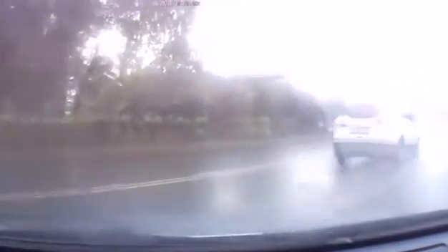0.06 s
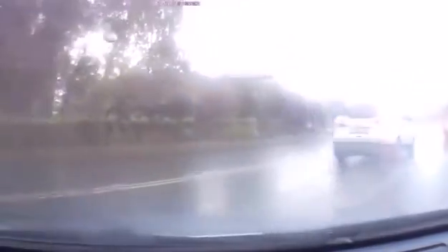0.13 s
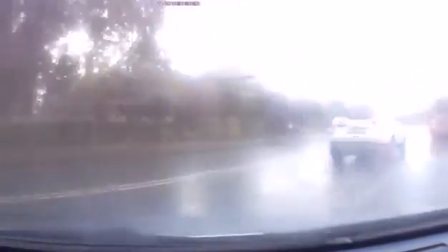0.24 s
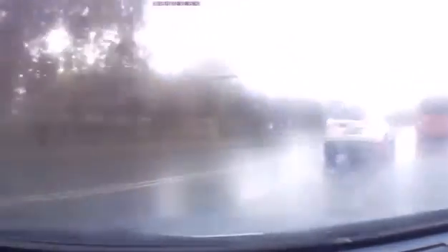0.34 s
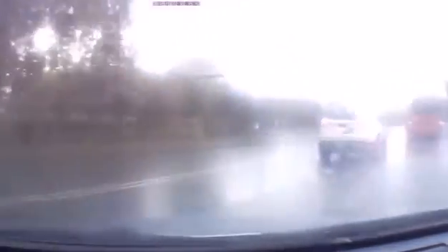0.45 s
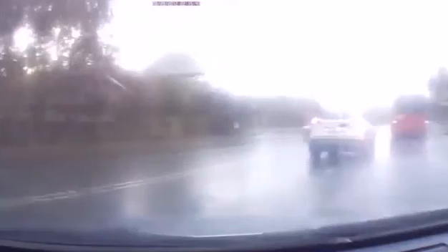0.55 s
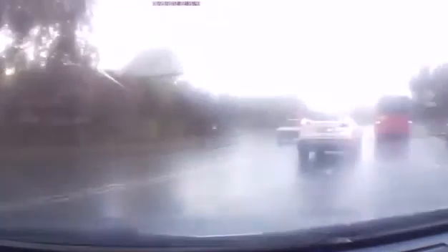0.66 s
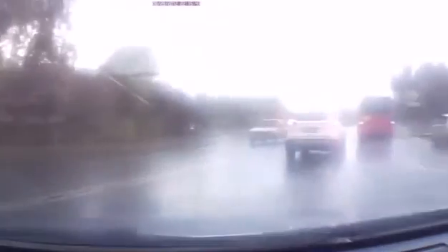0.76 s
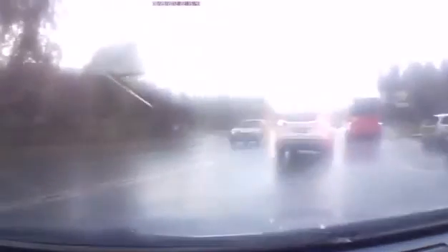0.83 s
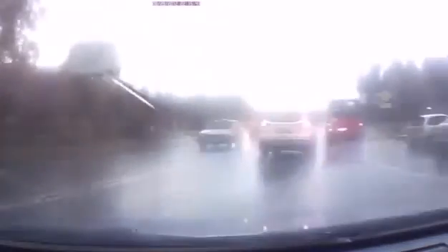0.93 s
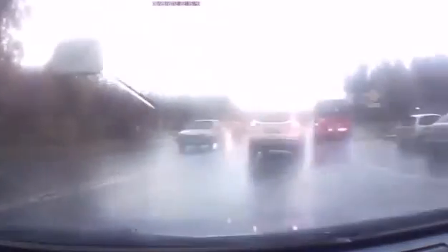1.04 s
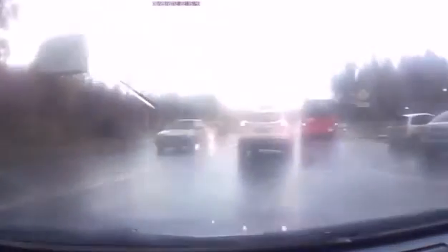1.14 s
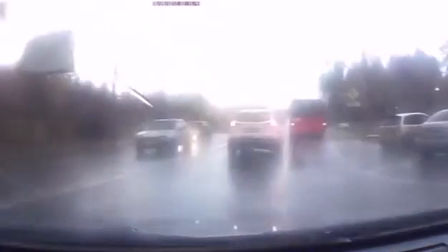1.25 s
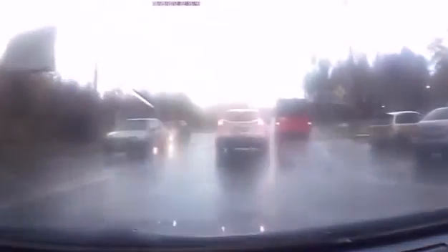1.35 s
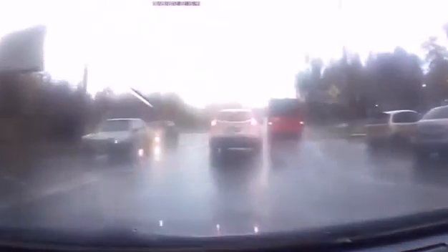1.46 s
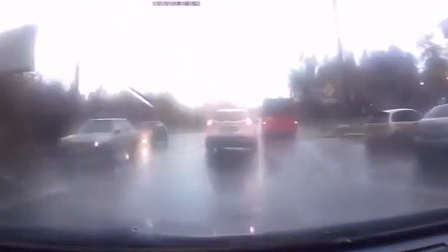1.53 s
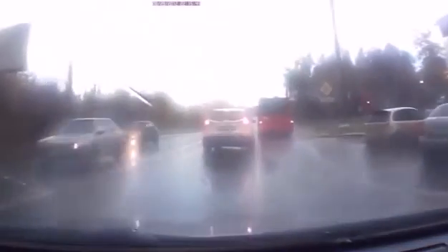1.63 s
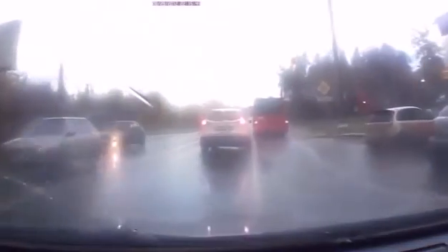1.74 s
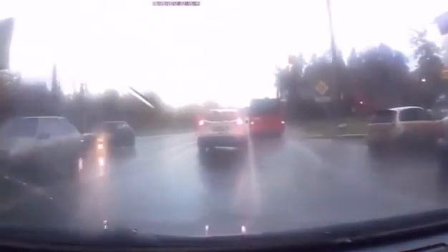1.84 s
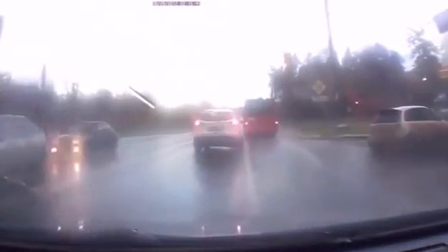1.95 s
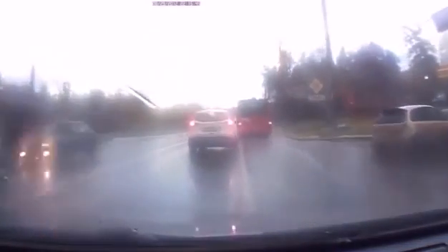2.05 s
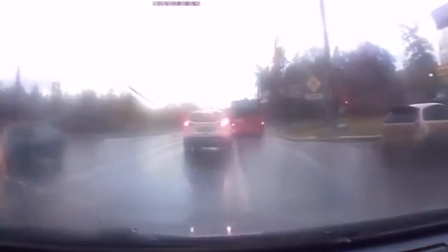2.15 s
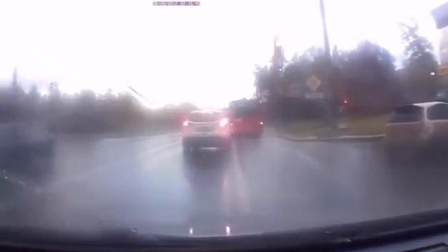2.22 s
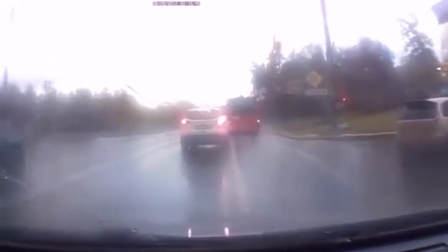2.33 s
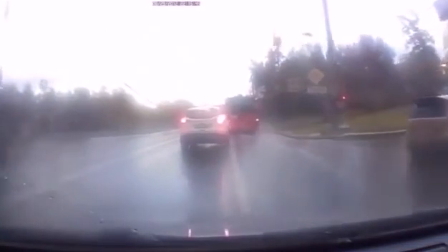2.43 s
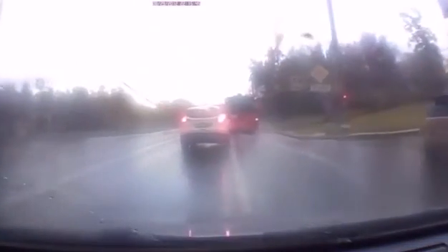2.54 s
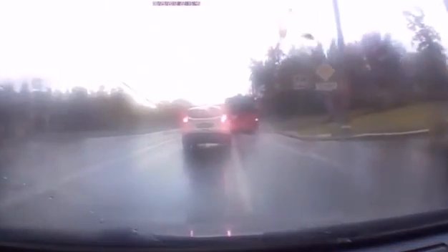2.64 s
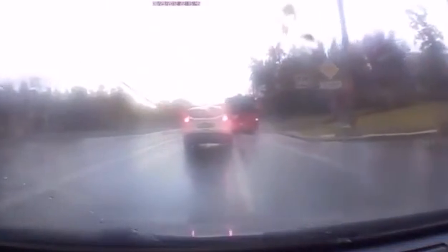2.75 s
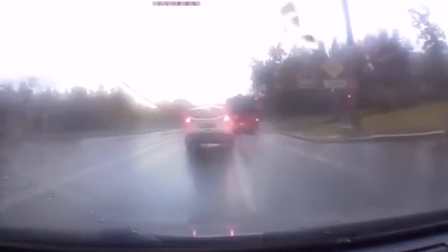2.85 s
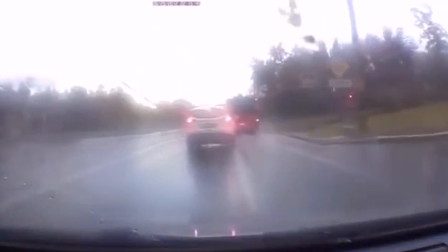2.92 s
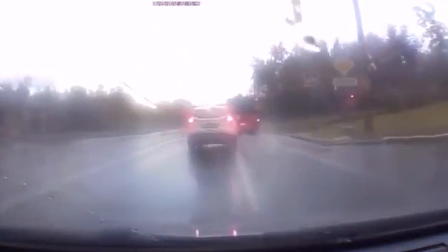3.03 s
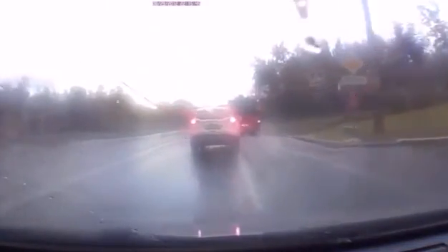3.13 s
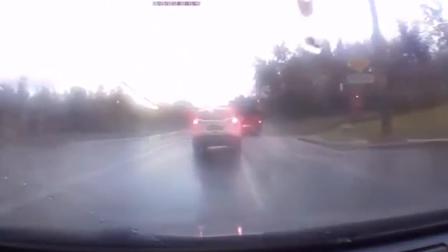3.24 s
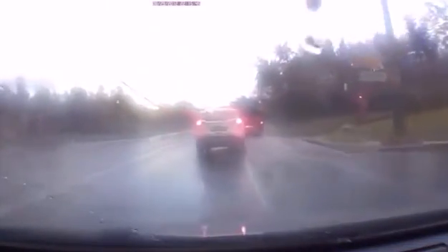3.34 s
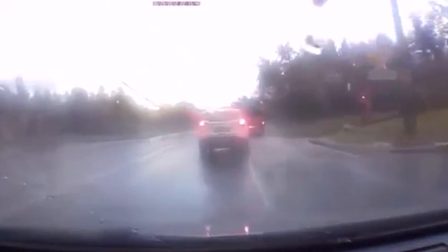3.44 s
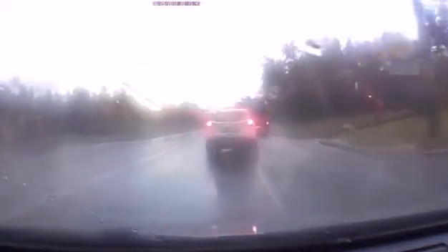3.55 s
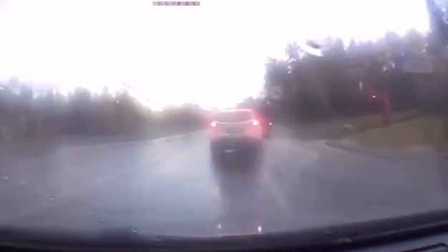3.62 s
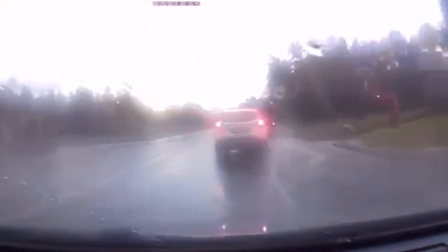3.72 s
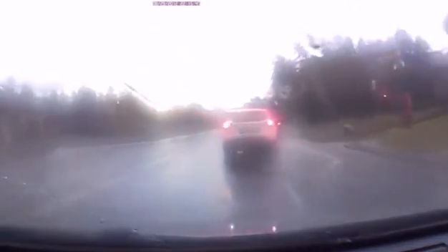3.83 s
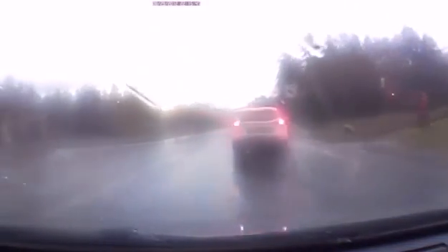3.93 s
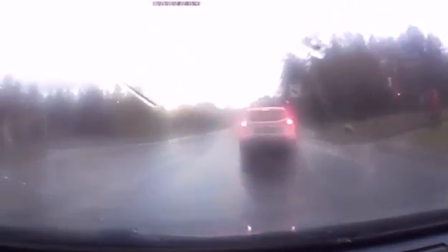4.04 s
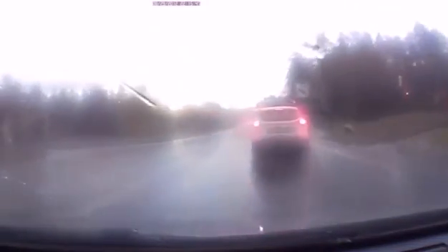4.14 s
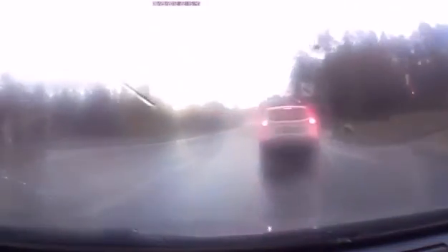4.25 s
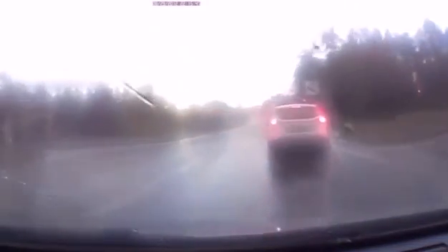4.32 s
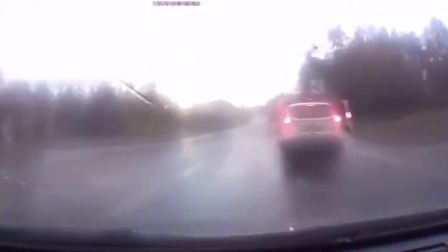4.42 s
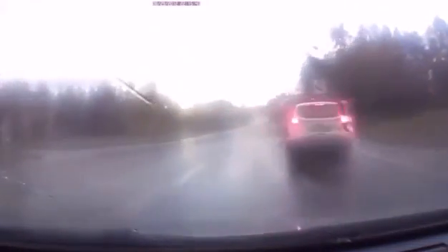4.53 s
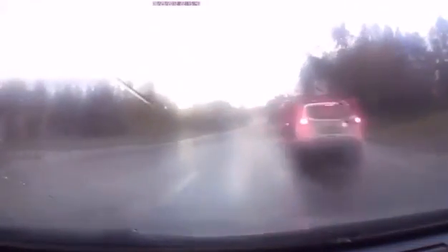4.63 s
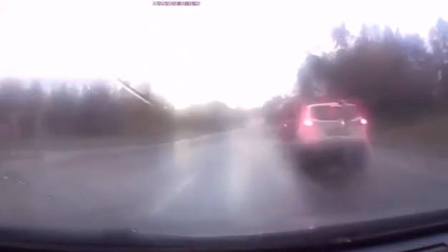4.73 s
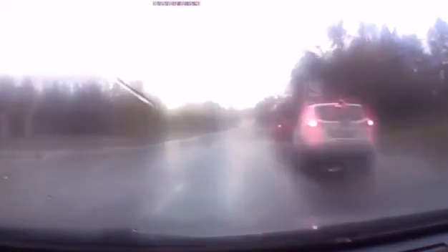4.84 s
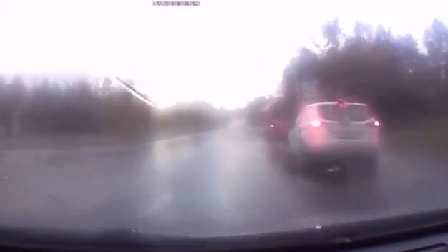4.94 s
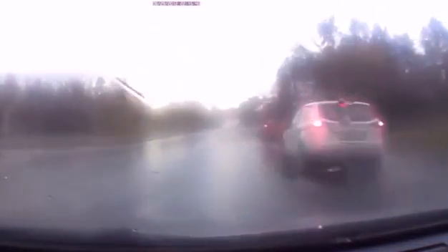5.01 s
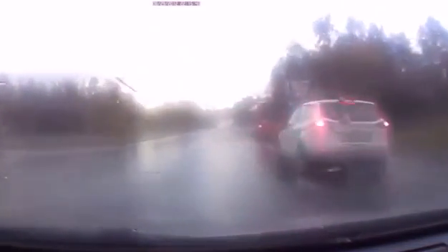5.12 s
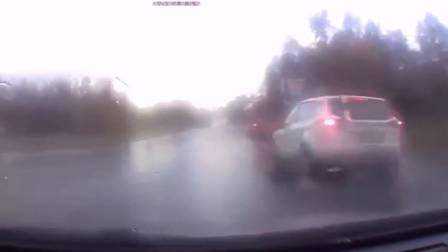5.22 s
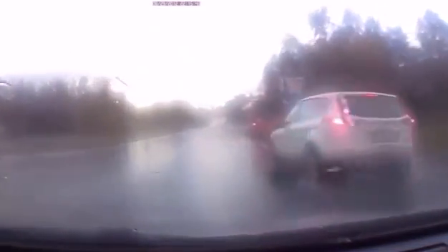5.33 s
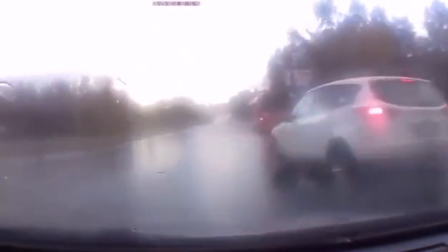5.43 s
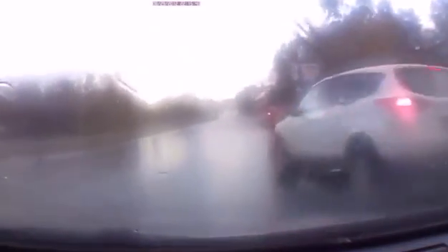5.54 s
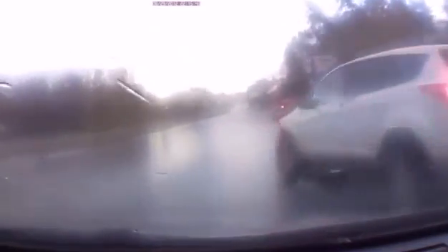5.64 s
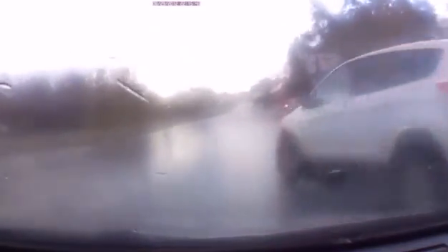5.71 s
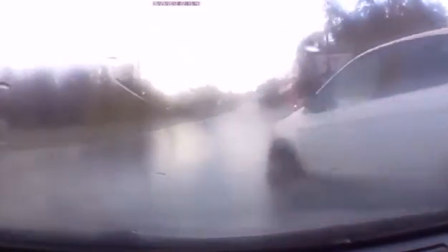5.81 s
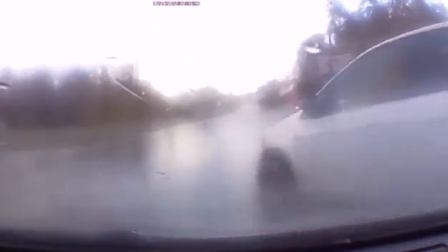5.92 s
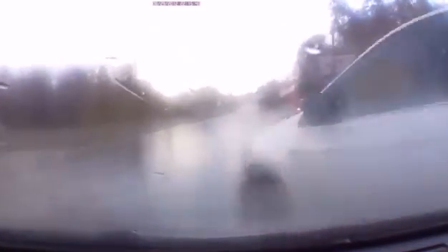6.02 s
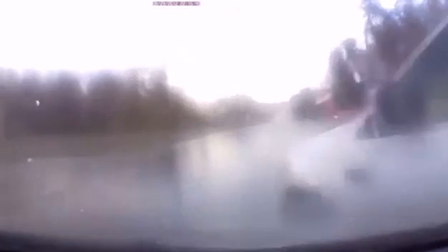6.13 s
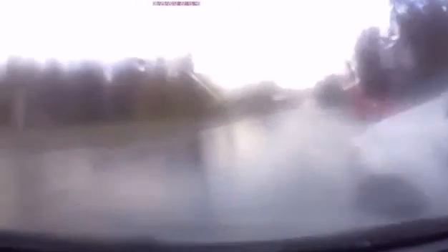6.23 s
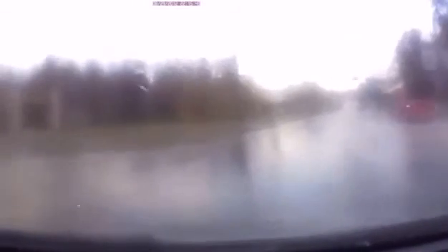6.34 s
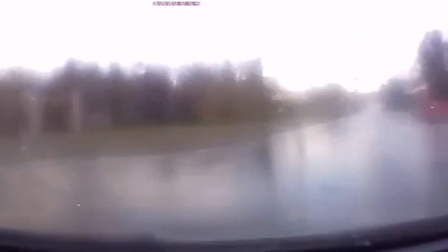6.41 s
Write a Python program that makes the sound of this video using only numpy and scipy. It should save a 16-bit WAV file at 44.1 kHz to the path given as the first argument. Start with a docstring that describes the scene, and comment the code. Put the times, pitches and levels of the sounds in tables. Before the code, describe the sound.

Inside a small car on a wet road, the engine pulls, shifts and revs again, trim rattles under braking, then a violent crunching crash.

```python
"""Inside a small car on a wet road, microphone on the windscreen: the engine pulls, shifts up and pulls again.
Engine lines follow the firing rate over a growl of unequal cylinders; shaped noise makes tyres and passing traffic.
Clustered clicks ring the loose dashboard trim as the car brakes, shudders and hits another car.
Heavier clusters thump the body, crumple panels and splinter plastic until the microphone overloads."""
import sys
import numpy as np
from scipy import signal
from scipy.fft import rfft, irfft
from scipy.io import wavfile
from scipy.ndimage import uniform_filter1d

SR = 44100
rng = np.random.default_rng(int(sys.argv[2]) if len(sys.argv) > 2 else 0)


def log_audio(samples):
    """Write samples as a 16-bit WAV file to the path given in sys.argv[1]."""
    # one column per channel
    frames = np.atleast_2d(samples).T
    # limit to full scale, then quantise
    limited = np.clip(frames, -1, 1)
    pcm = np.round(limited * 32767).astype(np.int16)
    wavfile.write(sys.argv[1], SR, pcm)


N = 285327
T = np.arange(N) / SR
BRAKE_S = 5.53  # hard braking begins

# engine load, a gentle pull, the clutch, a hard pull, then off the pedal: [t/s, level/dB]
LOAD = [(0, -19.5), (1.35, -8), (1.85, -13.5), (2.18, -5.5), (2.62, -11), (2.85, -19), (3.1, -22.5),
        (3.36, -3), (3.55, -0.5), (4.9, -2.5), (5.45, 2.5), (5.65, -13), (6.47, -22)]
# spectrum of tyre spray: [f/Hz, level/dB]
SPRAY_SPECTRUM = [(700, 3), (1450, 12), (1900, 1.5), (2400, 2), (2800, 0.5), (3150, -6.5), (3700, -1.5),
                  (4300, -17), (4900, -12.5), (7000, -18.5), (15000, -23)]
# spectrum of ticking and cracking plastic: [f/Hz, level/dB]
PLASTIC_SPECTRUM = [(1500, -28.5), (3600, 12), (4300, 0.5), (4900, 6), (5600, -10), (6600, -2),
                    (8000, -6.5), (12500, -7.5), (15000, -9.5)]
# resonances of the body shell: [f/Hz, width/Hz, level/dB]
SHELL_MODES = [(42, 32, 0.5), (72, 31.8, 1.5), (129.5, 17, 2), (175.3, 16.5, 6.5), (199.2, 17.4, 5),
               (241, 30, 0), (302, 22.4, -3.5), (373, 21, -6), (433, 30, -2), (476, 30, -7)]
# bumpers touch, then the front corner gives way in stages:
# [t/s, body thud level/dB, sheet-metal crunch level/dB, splinter level/dB, length/s]
IMPACTS = [(6.307, -2.5, -32, -55, 0.0029), (6.313, -14, -12.5, -45, 0.0021),
           (6.325, -5.5, -9.5, -38, 0.0076), (6.338, 4, -7, -24.5, 0.0034), (6.344, -5.5, -5, -27, 0.0028),
           (6.351, 0.5, 0, -20.5, 0.0032), (6.361, 4, -15, -30, 0.0041), (6.372, -2, -2.5, -43, 0.0088),
           (6.384, -3, 1, -24, 0.0035), (6.392, -6, -8, -25, 0.0042), (6.404, 0.5, -28, -36, 0.0081),
           (6.412, 3, -5, -28, 0.002), (6.42, -9, -5, -22, 0.0039), (6.428, 6.5, -6.5, -21, 0.0028),
           (6.434, -11, 1, -19, 0.0039), (6.442, 2, -4.5, -24, 0.0038), (6.45, -11, -15, -29, 0.0099)]


def engine(boom_db=1, waver_db=.5, uneven_db=-8, wobble=0.002, rough_db=2):
    """Low firing orders boom in the cabin, unequal cylinders growl in quarter orders, and gears whine."""
    # four-cylinder firing rate: [t/s, f/Hz]
    revs = [(0, 45.79), (.5, 60.32), (1, 76.02), (1.5, 88.95), (2, 102.8), (2.28, 111.4), (2.6, 102.4),
            (3, 88.33), (3.38, 76.03), (3.6, 66.6), (4, 74.02), (4.5, 83.08), (5, 90.05), (5.5, 99),
            (6.47, 89.76)]
    # cabin response to a firing order, before boom_db and load: [f/Hz, level/dB]
    boom_response = [(50, -18), (68, -38.5), (78, -27), (98, -29.5), (110, -25.5), (120, -29.5), (134, -30),
                     (150, -34), (172, -35.5), (190, -42.5), (228, -51), (248, -34), (280, -54), (335, -42)]
    # gearbox and belt drive: [multiple of firing rate, lower-gear level/dB, higher-gear level/dB]
    whines = [(3.72, 2, -7.5), (4, -21, -11), (4.44, -2.5, -10), (4.95, 1, -3), (5.4, 2, -10),
              (5.98, -2, 1), (7, 2, -5), (10.96, 2, -6)]
    # cabin resonances that a whine sweeps through: [f/Hz, level/dB]
    whine_path = [(260, -14), (335, 6.5), (390, -11), (445, 1), (490, 3), (550, -4.5), (670, -4.5),
                  (850, -15), (1150, -11.5)]
    # spectrum of the growl: [f/Hz, level/dB]
    growl_spectrum = [(100, -22), (180, -4), (260, 1), (350, -1), (430, -12), (490, 3.5), (660, 2),
                      (850, -10.5), (1150, -19), (1500, -61.5), (3000, -70)]
    shift_s, shift_length_s, high_gear_growl_db = 2.18, 0.27, -4
    # base levels hold at reference_hz and 0 dB load; both grow with revs and a share of the load
    reference_hz = 97.6
    base_growl_db, growl_db_per_hz, growl_load_share = -40.5, 0.15, 0.55
    base_whine_db, whine_db_per_hz, whine_load_share = -45.5, 0.36, 0.63

    hz, = curves(revs)
    load_db, = curves(LOAD)
    shifted = np.clip((T - shift_s) / shift_length_s, 0, 1)
    extra_hz = hz - reference_hz

    # uneven firings shake the crank speed, which blurs the high orders most
    shake = .0038 * walk(45)
    phase = 2 * np.pi * np.cumsum(hz * (1 + shake + wobble * walk(14))) / SR

    def tone(order, db):
        """A wavering line locked to the crankshaft."""
        level = np.sqrt(2) * undb(db + waver_db * walk(21.15))
        return level * np.sin(order * phase + rng.uniform(0, 2 * np.pi))

    boom = 0
    for order in (1, 2, 3):
        boom = boom + tone(order, boom_db + load_db + response(boom_response, order * hz))

    whine_db = base_whine_db + whine_db_per_hz * extra_hz + whine_load_share * load_db
    whine = 0
    for order, low_db, high_db in whines:
        flutter_db = 1.8 * walk(60)
        gear_db = low_db + (high_db - low_db) * shifted
        path_db = response(whine_path, order * hz)
        whine = whine + tone(order, whine_db + gear_db + path_db + flutter_db)

    # one working cycle holds four firings and repeats; its harmonics leave room for the boom orders
    count = 2048
    harmonic = np.arange(count // 2 + 1)
    strength = np.where(harmonic % 4 == 0, 1, undb(uneven_db))
    strength = strength * (harmonic > 4) * (harmonic < 120) * (harmonic != 8) * (harmonic != 12)
    cycle = irfft(strength * np.exp(2j * np.pi * rng.random(len(harmonic))))
    firing = np.interp(phase / (8 * np.pi), np.arange(count) / count, cycle, period=1)
    growl = unit(colour(firing * undb(rough_db * walk(90)), growl_spectrum))
    growl_db = base_growl_db + growl_db_per_hz * extra_hz + growl_load_share * load_db
    growl_db = growl_db + high_gear_growl_db * shifted
    return boom + whine + undb(growl_db) * growl


def crash(thud_hz=700, crunch_hz=6000):
    """Every impact thumps the body shell, buckles the panels with a snap and a crunch, and cracks plastic."""
    # resonances of the outer panels: [f/Hz, width/Hz, level/dB]
    panel_modes = [(493, 110, 8), (654, 91, 0), (698, 29, 7.5), (825, 220, 0), (950, 72, 5.5),
                   (1070, 37, 8), (1133, 50, 1), (1230, 78, 4.5), (1420, 51, 7), (1480, 150, -1.5),
                   (1670, 150, -1), (1835, 250, -4.5), (2330, 53, -5), (2700, 160, -13), (3560, 280, -14.5),
                   (3760, 200, -19)]
    s, thud_db, crunch_db, splinter_db, length = np.transpose(IMPACTS)
    thuds = chatter(s, thud_db, length, rate=500, spread_db=3, rise=.3, main_db=14)
    crunches = chatter(s, crunch_db, length, rate=2200, spread_db=4, rise=.5, main_db=9)
    cracks = chatter(s, splinter_db, length, rate=4500, spread_db=3, rise=.7)
    shell = ring(soften(thuds, thud_hz), SHELL_MODES)
    panels = ring(soften(crunches, crunch_hz), panel_modes)
    return shell + cabin(panels + colour(cracks, PLASTIC_SPECTRUM))


def knocks(length=0.0022, thump_length=0.0097, thump_hz=240):
    """Loose things knock the dashboard, each spot ringing at its own pitch, and thump the body shell."""
    # [t/s, knock level/dB, body thump level/dB, contact hardness f/Hz, multiple of the dashboard's modes]
    blows_table = [(3.37, -46, -47, 1797, 1), (4.174, -35, -36, 991, .8), (5.063, -27.5, -38, 2020, 1.05),
                   (5.615, -15.5, -15, 5000, 1.03), (5.62, -35, -24, 3530, 1.25),
                   (5.737, -42, -21.5, 897, 1), (5.752, -36, -45, 3000, 1), (5.819, -29, -25, 5000, 1.1),
                   (5.827, -19.5, -28, 2500, .82), (6.04, -17.5, -19, 4000, .98)]
    # resonances of the dashboard: [f/Hz, width/Hz, level/dB]
    dash_modes = [(204.9, 69, 5.5), (450, 72, 10), (750, 120, 9.5), (1083, 110, 8), (1380, 91, -2),
                  (2340, 210, -11), (2860, 170, -17), (3370, 220, -18.5)]
    blows, thumps = 0, 0
    for s, db, thump_db, contact_hz, tuning in blows_table:
        blow = chatter([s], [db], [length], rate=2500, spread_db=3, rise=.2, main_db=18)
        modes = [(hz * tuning, width, mode_db) for hz, width, mode_db in dash_modes]
        blows = blows + ring(soften(blow, contact_hz), modes)
        thumps = thumps + chatter([s], [thump_db], [thump_length], rate=900, spread_db=3, rise=.3, main_db=16)
    return blows + ring(soften(thumps, thump_hz), SHELL_MODES)


def trim(tick_db=-21):
    """Plastic parts of slightly different pitch bounce: each impact ticks and rings its part."""
    # loudest rattles of the loose dashboard trim: [t/s, level/dB, chatter length/s, tick brightness level/dB]
    rattles = [(.424, -49.5, 0.004, 6), (2.461, -41.5, 0.0031, 8), (2.49, -44, 0.0027, 6),
               (2.949, -48.5, .007, 3), (3.21, -45.5, 0.02, 0), (3.416, -42, 0.0088, 4),
               (3.4735, -32.5, 0.0022, -6), (4.039, -39.5, 0.0044, 6), (4.196, -42, .0025, 6),
               (4.227, -40, 0.0033, 1), (4.276, -48, 0.0076, 7), (4.383, -35.5, 0.011, -1),
               (4.396, -28.5, 0.0032, 0.5), (4.404, -32, 0.0025, 1), (4.432, -38, 0.0028, -2),
               (4.457, -49, 0.0029, 5), (4.468, -31.5, 0.0027, 1.5), (4.494, -41, 0.0036, 1),
               (4.533, -39, 0.0098, -5), (4.552, -32, 0.0053, -22), (4.564, -41, 0.0094, 2),
               (4.722, -37.5, .004, -3), (4.737, -38.5, 0.0054, -5.5), (4.744, -32.5, 0.0028, -17),
               (4.947, -36, .0027, -9), (4.962, -33, 0.0029, -3), (5.026, -38, 0.0058, -5),
               (5.049, -43, 0.0028, 4), (5.066, -39.5, 0.0076, -9), (5.102, -42, 0.0048, -13),
               (5.134, -37.5, 0.0083, -6), (5.156, -41, 0.0021, -4), (5.198, -32.5, 0.0034, -3),
               (5.22, -40.5, 0.0086, -10), (5.242, -33, 0.007, -1.5), (5.384, -37, 0.0062, -14),
               (5.467, -35, 0.0047, -17), (5.502, -41.5, 0.0081, -3), (5.533, -40.5, .004, 1),
               (5.617, -31.5, 0.0053, 4), (5.666, -35.5, 0.007, 1), (5.746, -38.5, 0.013, 5),
               (5.812, -29, 0.0056, 3.5), (5.824, -28.5, 0.0048, 5), (5.875, -34.5, 0.004, 9.5),
               (5.964, -33.5, 0.013, -6), (6.041, -31.5, 0.0061, 8.5), (6.054, -48, 0.0056, 5),
               (6.152, -38, 0.0035, -4), (6.216, -37.5, 0.0082, 3), (6.245, -47, 0.0042, 5)]
    # resonances of the trim: [f/Hz, width/Hz, level/dB]
    trim_modes = [(826, 100, 9), (1217, 190, 6), (1390, 126, 9), (1848, 290, 5.5), (1991.6, 268, 4),
                  (2245, 167, -2), (2780, 140, -6.5), (3600, 220, -12.5), (3820, 210, -12.5),
                  (4900, 220, -16), (5860, 250, -22), (7000, 370, -32), (8700, 600, -29)]
    # pitch of each loose part: [multiple of the trim's modes]
    part_tunings = [.97, 0.96, 1.03]
    rows = np.vstack([rattles, fidgets()])
    part = rng.integers(len(part_tunings), size=len(rows))
    out = 0
    for k, tuning in enumerate(part_tunings):
        s, db, length, bright_db = rows[part == k].T
        body = chatter(s, db, length, rate=5000, spread_db=2, rise=.9, bounce_db=9, main_db=4)
        ticks = chatter(s, db + bright_db, length, rate=9000, spread_db=2, rise=.9, bounce_db=7)
        modes = [(hz * tuning, width, mode_db) for hz, width, mode_db in trim_modes]
        out = out + ring(body, modes) + undb(tick_db) * colour(ticks, PLASTIC_SPECTRUM)
    return out


def fidgets(count=64):
    """Rows of small chance rattles, thicker and louder with time; half come in the shudder of braking."""
    start_db, db_per_s, scatter_db = -68, 4, 7.5
    mean_length_s, mean_bright_db = 0.005, 0.5
    when, size, span, shine = rng.random((count, 4)).T
    crash_s = IMPACTS[0][0]
    driving_s = crash_s * np.sqrt(np.maximum(when, 1 / count))  # denser towards the collision
    braking_s = BRAKE_S + when * (crash_s - BRAKE_S)
    s = np.where(np.arange(count) % 2, driving_s, braking_s)
    db = start_db + db_per_s * s + scatter_db * (2 * size - 1)
    return np.transpose([s, db, mean_length_s * (.5 + span), mean_bright_db * 2 * shine])


def jolts():
    """Road dips, gear change, hard braking and collision set the body rocking as decaying sines."""
    # the body on its springs: [t/s, level/dB, f/Hz, time to fall 60 dB/s]
    swings = [(0.11, -44, 33.3, 0.88), (2.619, -27, 30.5, 1.1), (3.181, -18, 28.2, 1.14),
              (5.07, -21, 32.7, 0.3), (5.824, -16, 33.2, 0.75), (6.035, -16, 38.3, 0.6),
              (6.206, -19, 42, 0.92), (6.385, -5, 29.3, 0.81)]
    out = np.zeros(N)
    for s, db, hz, t60 in swings:
        age = np.maximum(T - s, 0)
        out += undb(db) * np.sin(2 * np.pi * hz * age) * np.exp(-np.log(1000) * age / t60)
    return out


def tyres(patchy_db=1, splash_db=2.5, bumpy_db=1):
    """Road shakes the body, road and engine drum the floor, tread roars, water sprays the wheel arches."""
    # spectrum of the body rumble: [f/Hz, level/dB]
    rumble_spectrum = [(12, -35), (22, 5), (32, -4.5), (50, -5), (75, -6), (110, -14), (200, -19)]
    # spectrum of the drumming floor: [f/Hz, level/dB]
    drum_spectrum = [(50, 5.5), (85, 5.5), (145, 8.5), (200, -2), (260, -0.5), (330, -46.5), (450, -21.5)]
    # levels at the start and their drift as the car gathers speed, up to the braking
    rumble_db, rumble_db_per_s = -33, -0.2
    drum_db, drum_db_per_s, drum_load_share = -40, 2.07, 0.2
    roar_db, roar_db_per_s = -49.5, 2
    spray_db, spray_db_per_s = -66.5, 0.55
    # under hard braking the tyres scrub through the water
    brake_attack_s, brake_roar_db, brake_spray_db = 0.12, 2.5, 10.5

    load_db, = curves(LOAD)
    run_up = np.minimum(T, BRAKE_S)
    braking = np.clip((T - BRAKE_S) / brake_attack_s, 0, 1)
    bumps = bumpy_db * walk(6.5)
    patches = patchy_db * walk(16)
    splashes = splash_db * walk(70)
    rumble = noise(rumble_spectrum) * undb(rumble_db + rumble_db_per_s * run_up + bumps)
    floor_db = drum_db + drum_db_per_s * run_up + drum_load_share * load_db
    drum = noise(drum_spectrum) * undb(floor_db + bumps)
    roar = tread() * undb(roar_db + roar_db_per_s * run_up + brake_roar_db * braking + patches)
    wet_db = spray_db + spray_db_per_s * run_up + brake_spray_db * braking
    spray = cabin(noise(SPRAY_SPECTRUM)) * undb(wet_db + splashes)
    return rumble + drum + roar + spray


def tread():
    """Tyre roar as heard inside: a broad band, and the narrow cabin resonances that it excites."""
    # spectrum of the broad roar: [f/Hz, level/dB]
    roar_spectrum = [(150, 8), (260, 6.5), (350, 7), (420, 1), (500, 3.5), (590, -3.5), (700, -8.5),
                     (850, -9.5), (1120, -6.5), (1500, -20), (2200, -33), (4000, -61)]
    # narrow cabin resonances, relative to one another: [f/Hz, width/Hz, level/dB]
    cabin_modes = [(492.4, 29, 7), (539, 57, -1), (617, 32, 3), (676, 44, 0), (771.5, 21, -3),
                   (907, 22, -3), (1055, 29, -2.5), (1215, 92, -12)]
    resonance_db = -5.5
    return noise(roar_spectrum) + undb(resonance_db) * ring(rng.standard_normal(N), cabin_modes)


def oncoming():
    """Traffic goes by in the other lane: a swell of tread roar, then its spray."""
    # oncoming cars: [t when nearest/s, swell width/s, tread roar level/dB]
    cars = [(1.901, 0.5, -45.5), (2.24, 0.1, -41.5)]
    trail_s, trail_db = 0.39, -21.5  # the spray follows, quieter than the roar
    roar = sum(undb(db) * passing(s, width) for s, width, db in cars)
    spray = sum(undb(db + trail_db) * passing(s + trail_s, width) for s, width, db in cars)
    return tread() * roar + cabin(noise(SPRAY_SPECTRUM)) * spray


def passing(s, width):
    """Gain of a source that goes by: one over its distance, 1 when nearest."""
    return 1 / np.hypot(1, (T - s) / width)


def cabin(x):
    """Add the short reflections of the cabin and their brief diffuse tail, keeping the power."""
    # paths from the dashboard by way of windscreen, roof and windows: [delay/ms, gain]
    echoes = [(1.1, 0.042), (2.9, -0.042), (5.3, 0.14), (8.1, 0.24), (12.3, -0.14)]
    t60_s, tail_db = 0.065, -9
    count = 4096
    tail = rng.standard_normal(count) * np.exp(-np.log(1000) * T[:count] / t60_s)
    tail *= undb(tail_db) / np.sqrt(np.sum(tail ** 2))
    out = x + signal.oaconvolve(x, tail)[:N]
    power = 1 + undb(tail_db) ** 2
    for ms, gain in echoes:
        out = out + gain * np.interp(T - ms / 1000, T, x, left=0)
        power += gain ** 2
    return out / np.sqrt(power)


def chatter(times, dbs, lengths, rate, spread_db, rise=0.13, bounce_db=0, main_db=0):
    """Each contact is one impact, main_db above a cluster of tiny ones that builds and dies around it.

    rate is tiny impacts per second, rise a share of the length; bounce_db bunches them into bounces."""
    bounce_s, bounce_scatter = 0.0063, 0.12  # typical time between bounces, and its relative spread
    out = np.zeros(N)
    count = 4096
    lead = count // 4
    age = (np.arange(count) - lead) / SR
    for s, db, length in zip(times, dbs, lengths):
        hit = rng.random(count)
        size = rng.standard_normal(count)
        sign = rng.choice([-1, 1], count)
        gap = bounce_s * np.exp(bounce_scatter * size[0])
        clicks = (hit < rate / SR) * undb(spread_db * np.minimum(size, 2)) * sign
        clicks[lead] = undb(main_db)
        build = np.exp(-np.abs(age) / (rise * length))
        decay = np.exp(-(age / length) ** 2 / 2)
        clicks *= np.where(age < 0, build, decay)
        clicks *= undb(-bounce_db * np.sin(np.pi * age / gap) ** 2)
        clicks *= undb(db) * np.sqrt(length * SR / np.sum(clicks ** 2))  # db is the rms over one length
        i = int(s * SR) - lead
        out[i:i + count] += clicks[:N - i]
    return out


def ring(x, modes):
    """Drive a set of resonances, keeping the power of white noise."""
    out, power = 0, 0
    for k, (hz, width, db) in enumerate(modes):
        mode = signal.lfilter(*signal.iirpeak(hz, hz / width, fs=SR), x)
        out = out + (-1) ** k * undb(db) * mode  # neighbours alternate in sign
        power += undb(db) ** 2 * np.pi * width / SR
    return out / np.sqrt(power)


def soften(x, hz):
    """A yielding contact pushes for longer and so loses its treble."""
    return signal.sosfilt(signal.butter(2, hz, fs=SR, output="sos"), x)


def colour(x, points):
    """Shape a sound by a (f/Hz, level/dB) spectrum, keeping the power of white noise."""
    hz, db = np.transpose(points)
    f = np.maximum(np.fft.rfftfreq(N, 1 / SR), 1)
    gain = undb(response(points, f))
    gain = gain * np.minimum(1, f / hz[0]) * np.minimum(1, hz[-1] / f) ** 2  # fall off beyond both ends
    return irfft(rfft(x) * unit(gain), N)


def response(points, hz):
    """Level in dB of a (f/Hz, level/dB) spectrum at the given frequencies."""
    at_hz, db = np.transpose(points)
    return np.interp(np.log(hz), np.log(at_hz), db)


def noise(points):
    """Noise of rms 1 with a given spectrum."""
    return unit(colour(rng.standard_normal(N), points))


def walk(rate):
    """Random levels held 1 / rate s and slewed twice; spread near 1."""
    k = int(SR / rate)
    steps = np.repeat(rng.standard_normal(N // k + 1), k)
    return unit(uniform_filter1d(uniform_filter1d(steps, k), k)[:N])


def curves(table):
    """Each column of a table after its times as a control signal."""
    s, *columns = np.transpose(table)
    return [np.interp(T, s, c) for c in columns]


def unit(x):
    """Scale to rms 1."""
    return x / np.sqrt(np.mean(x ** 2))


def undb(db):
    """Decibels to gain."""
    return 10 ** (np.asarray(db) / 20)


def scene():
    """Everything as it reaches the windscreen."""
    dashboard = cabin(trim() + knocks())
    return (engine() + tyres() + oncoming() + jolts() + dashboard + crash())[None]


def record(dry):
    """The microphone flattens the loudest swings and hisses; filters smear the flat tops and cut the treble."""
    overload, hiss_db, top_hz = 0.69, -73.5, 14900
    x = dry / (1 + np.abs(dry / overload) ** 3) ** (1 / 3)
    x = x - 2 * signal.lfilter(*signal.iirpeak(1500, 1, fs=SR), x)  # all-pass: turns only the phase
    x = x * np.minimum(T / .004, 1)  # short fade-in
    x = x + undb(hiss_db) * rng.standard_normal(dry.shape)
    return signal.sosfilt(signal.ellip(10, .2, 80, top_hz, fs=SR, output="sos"), x)


dry = scene()
out = record(dry)
log_audio(out)
```